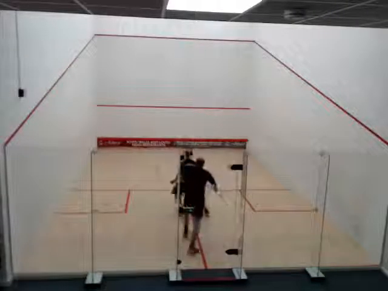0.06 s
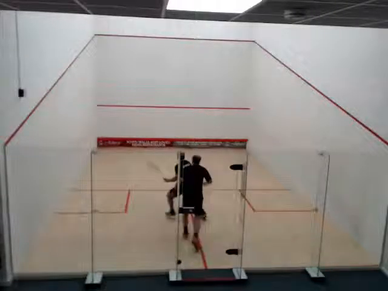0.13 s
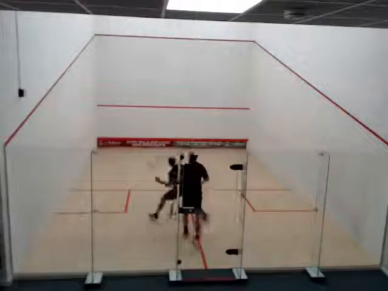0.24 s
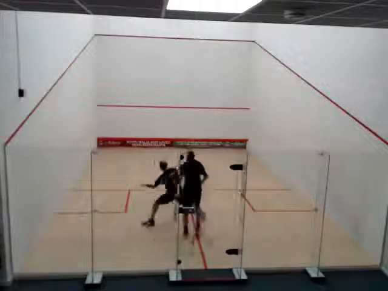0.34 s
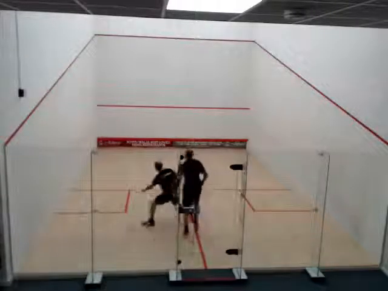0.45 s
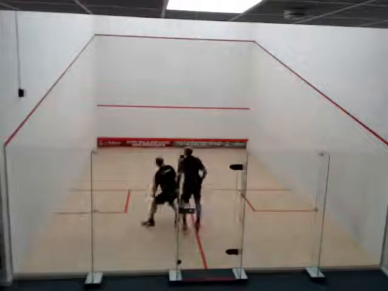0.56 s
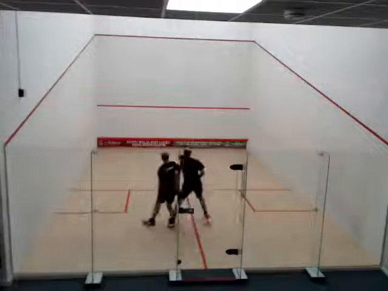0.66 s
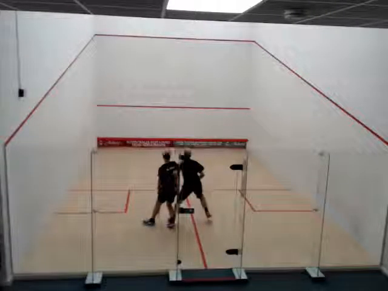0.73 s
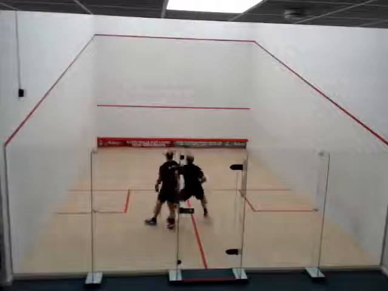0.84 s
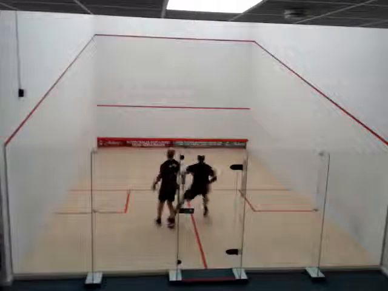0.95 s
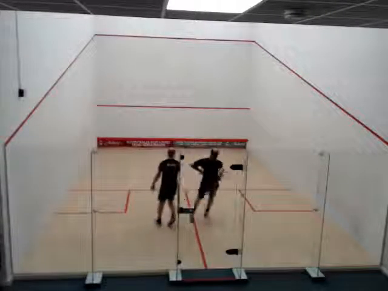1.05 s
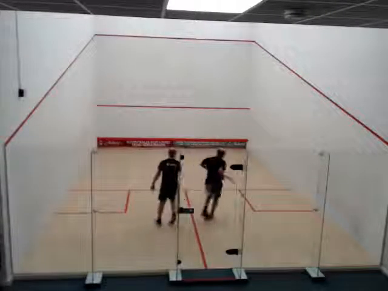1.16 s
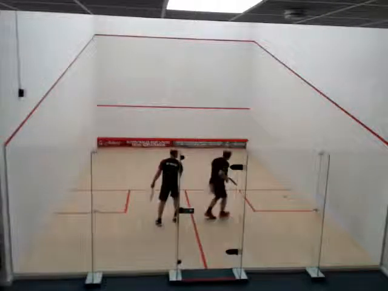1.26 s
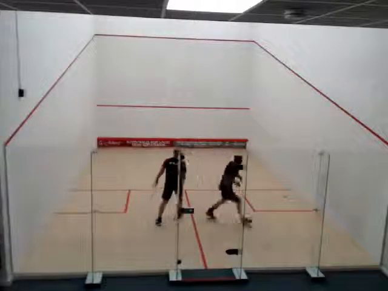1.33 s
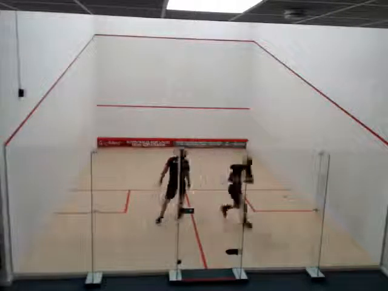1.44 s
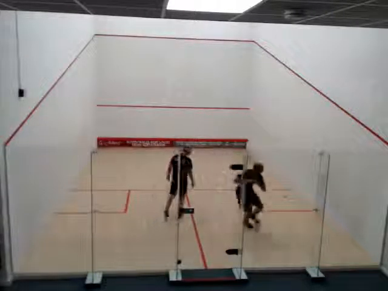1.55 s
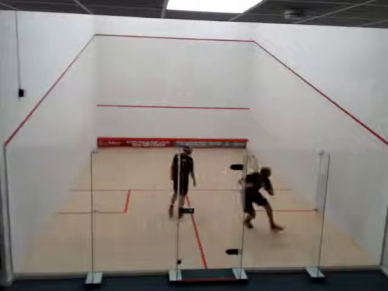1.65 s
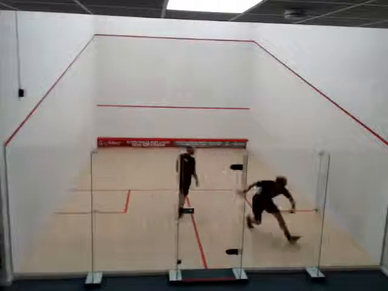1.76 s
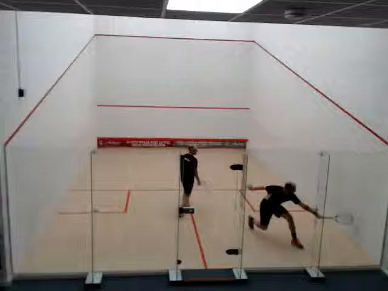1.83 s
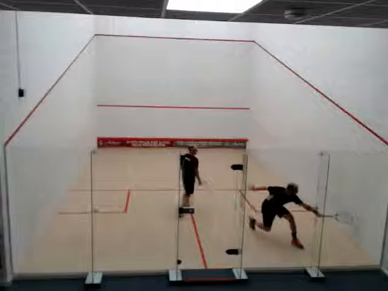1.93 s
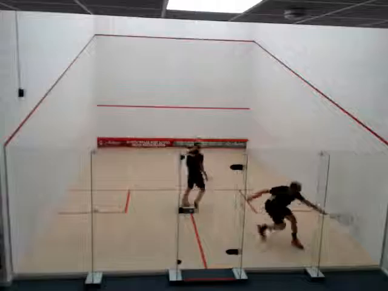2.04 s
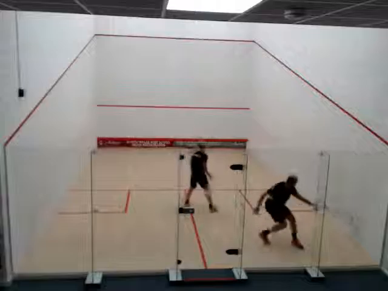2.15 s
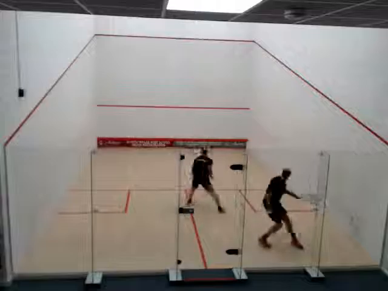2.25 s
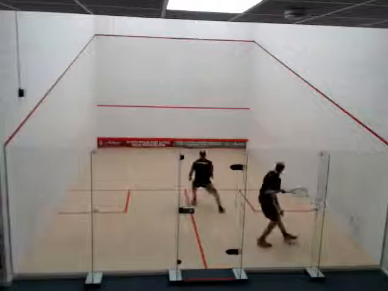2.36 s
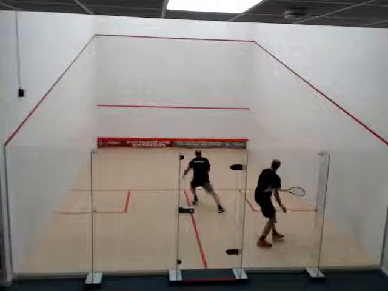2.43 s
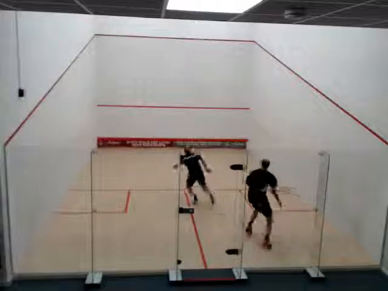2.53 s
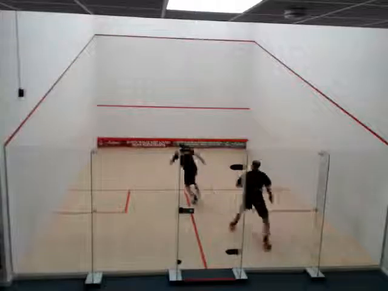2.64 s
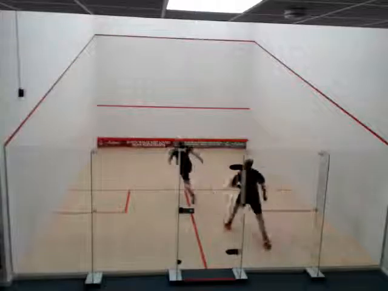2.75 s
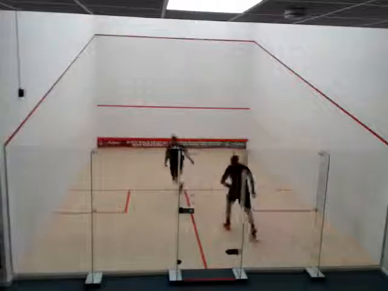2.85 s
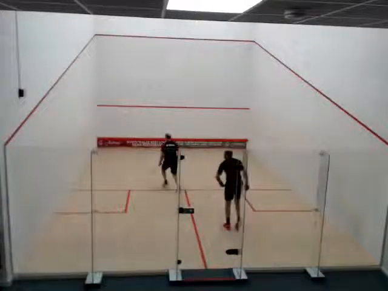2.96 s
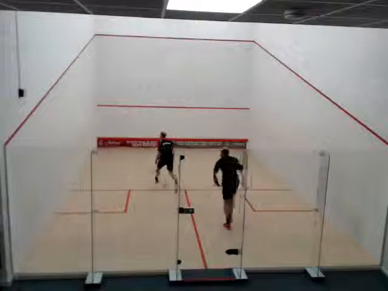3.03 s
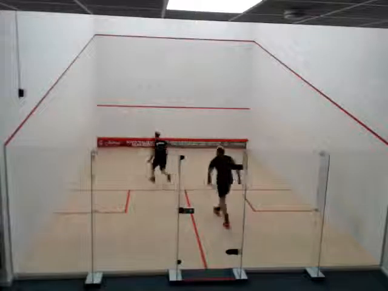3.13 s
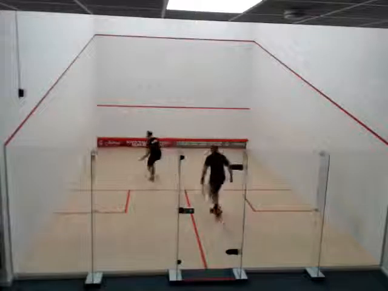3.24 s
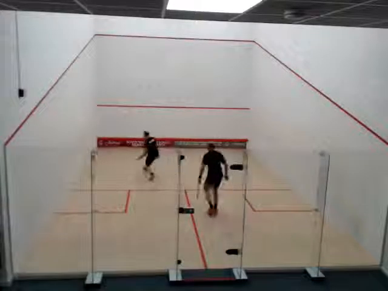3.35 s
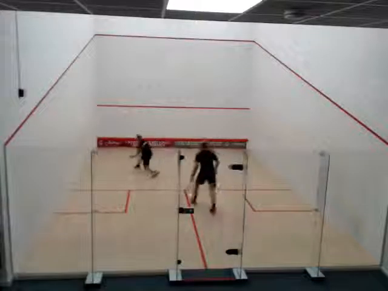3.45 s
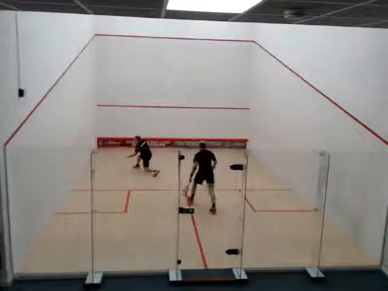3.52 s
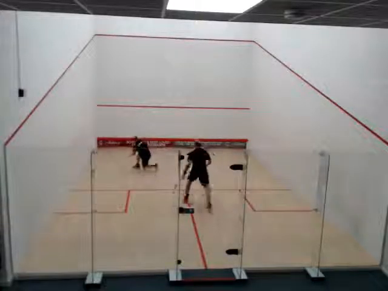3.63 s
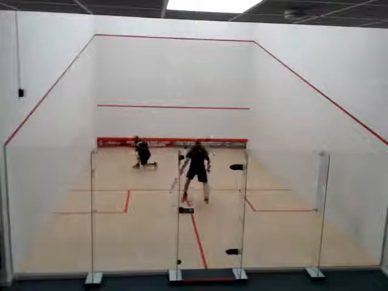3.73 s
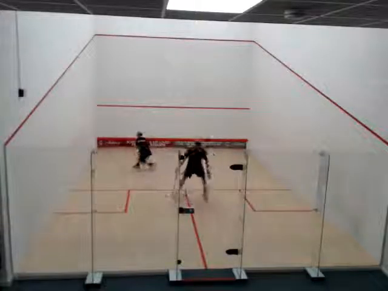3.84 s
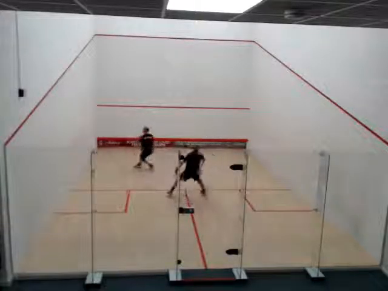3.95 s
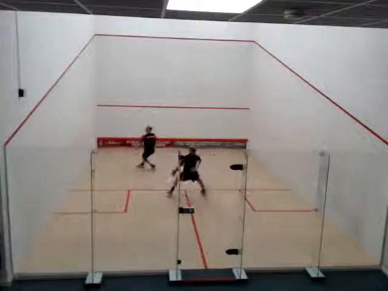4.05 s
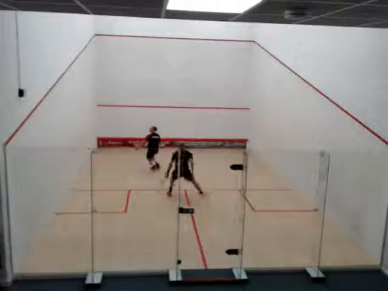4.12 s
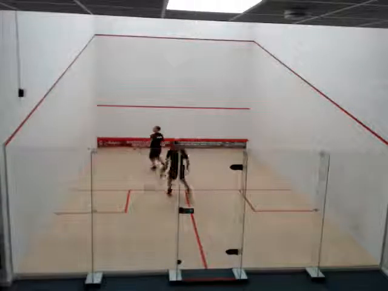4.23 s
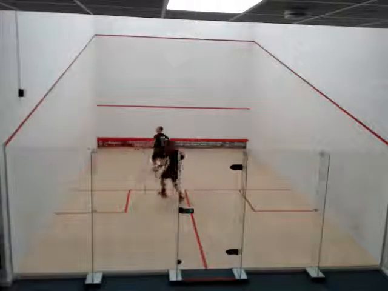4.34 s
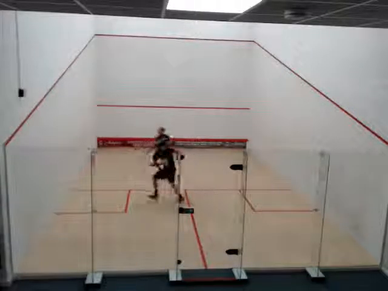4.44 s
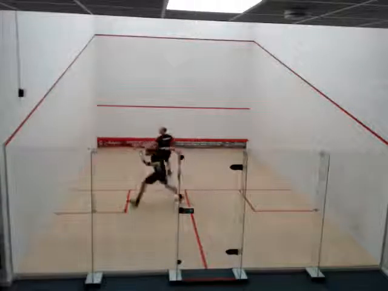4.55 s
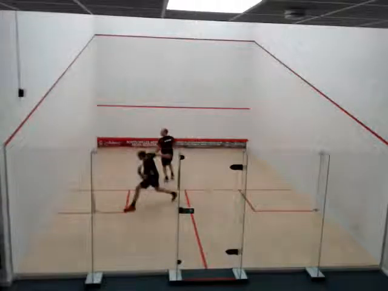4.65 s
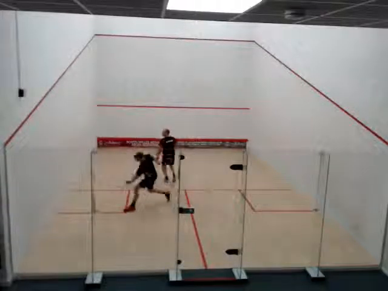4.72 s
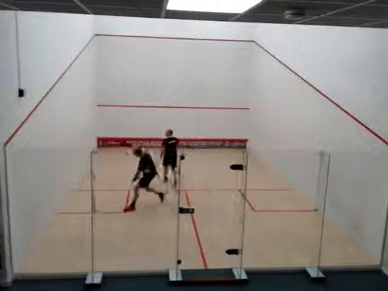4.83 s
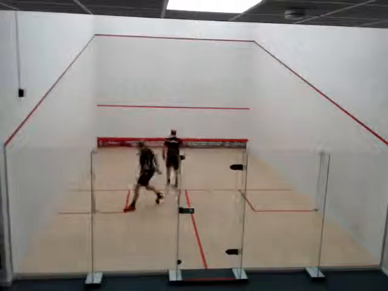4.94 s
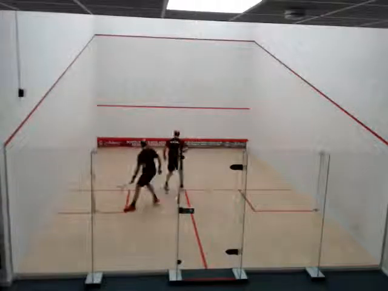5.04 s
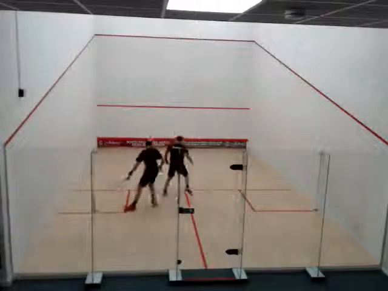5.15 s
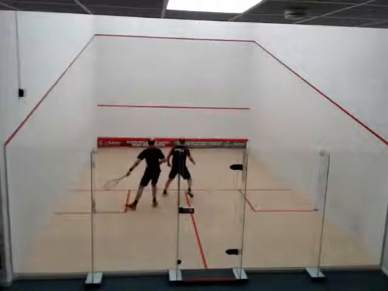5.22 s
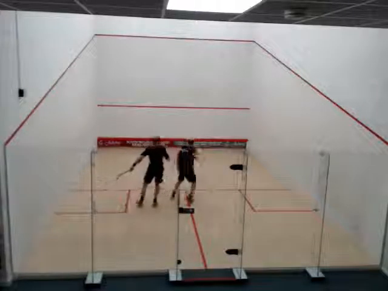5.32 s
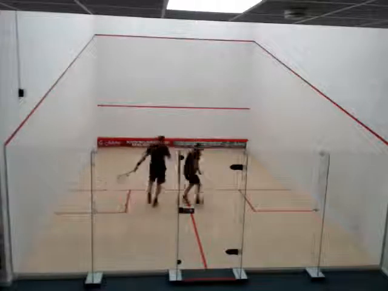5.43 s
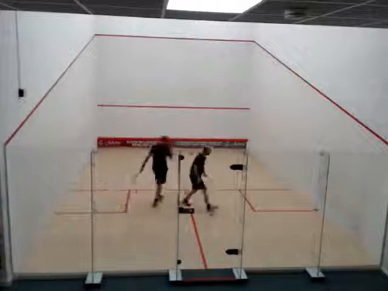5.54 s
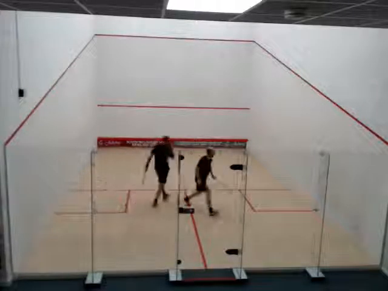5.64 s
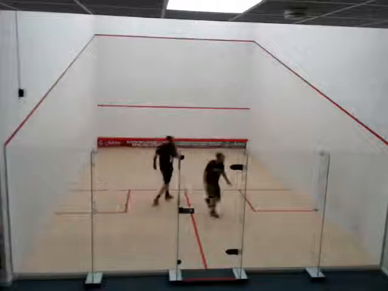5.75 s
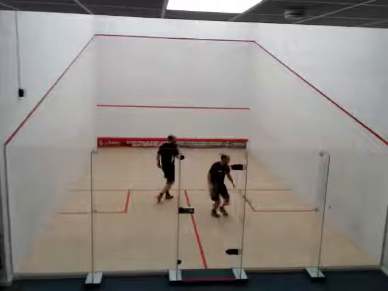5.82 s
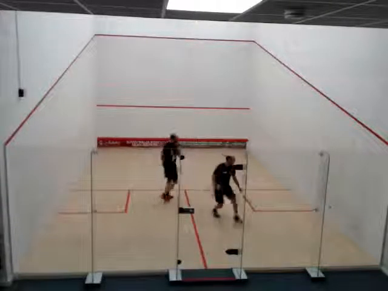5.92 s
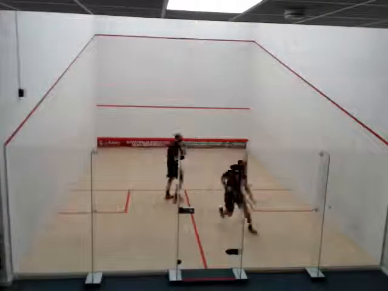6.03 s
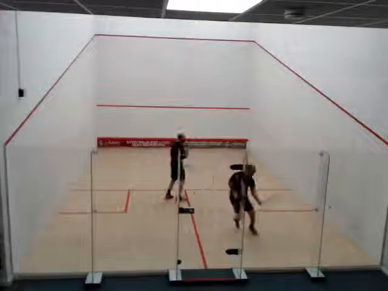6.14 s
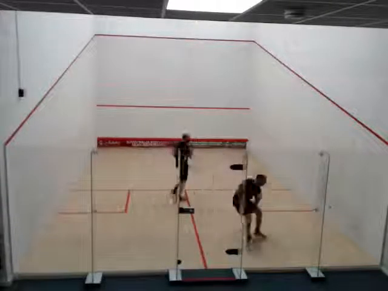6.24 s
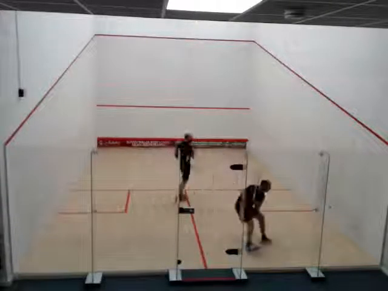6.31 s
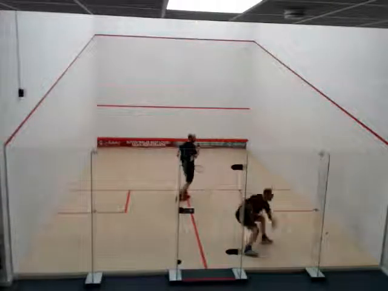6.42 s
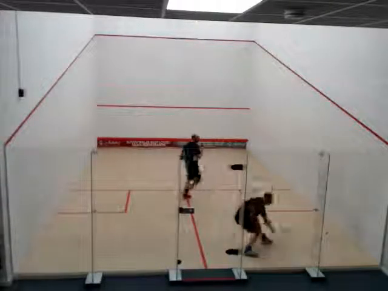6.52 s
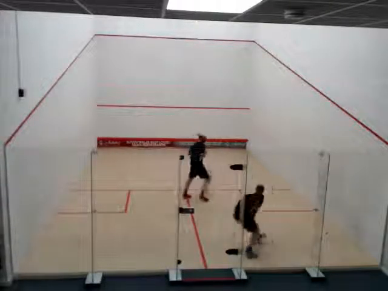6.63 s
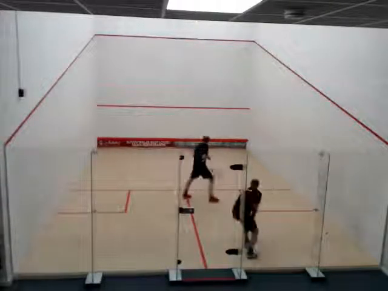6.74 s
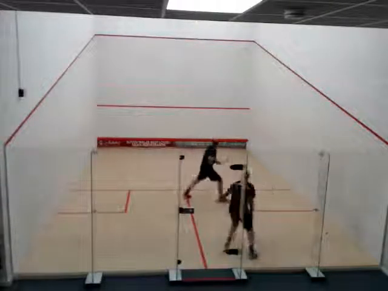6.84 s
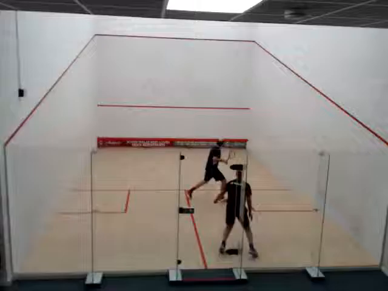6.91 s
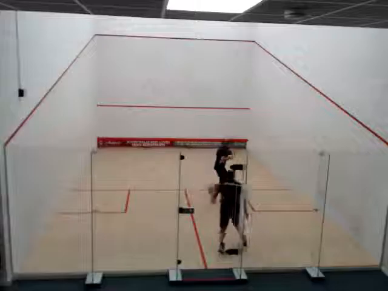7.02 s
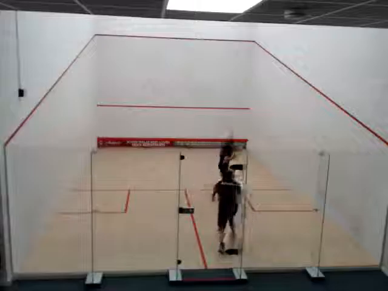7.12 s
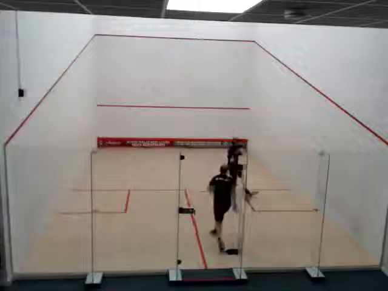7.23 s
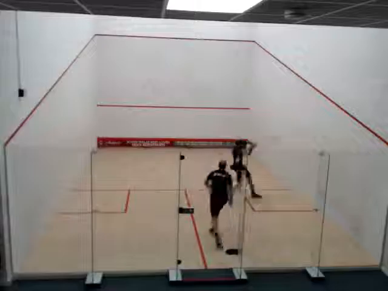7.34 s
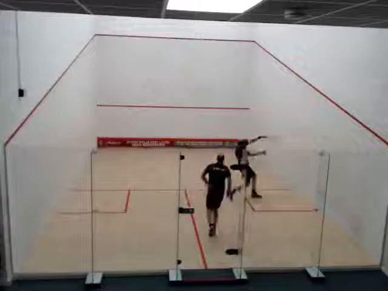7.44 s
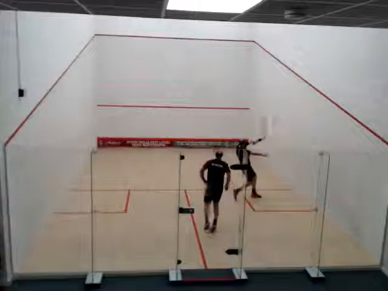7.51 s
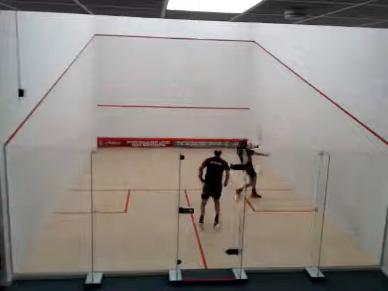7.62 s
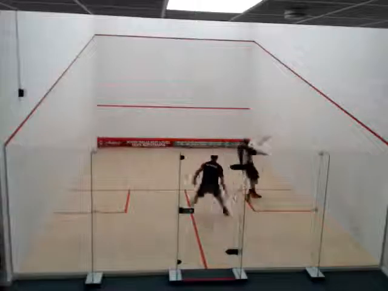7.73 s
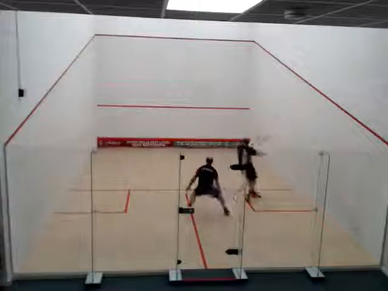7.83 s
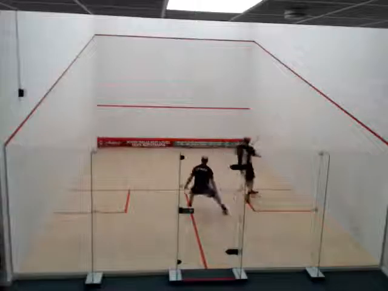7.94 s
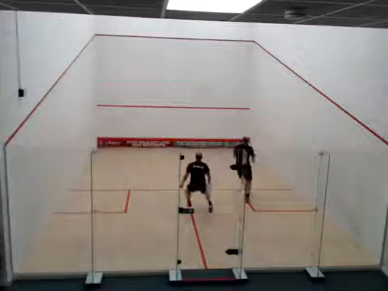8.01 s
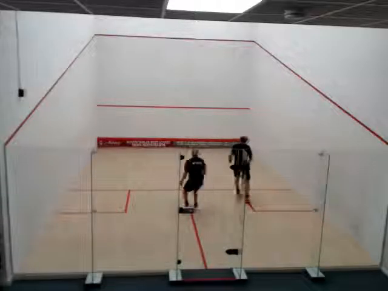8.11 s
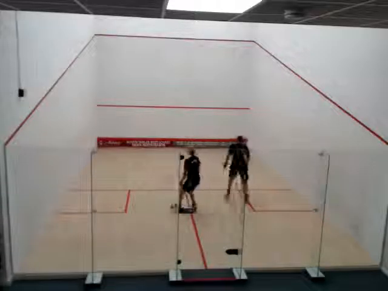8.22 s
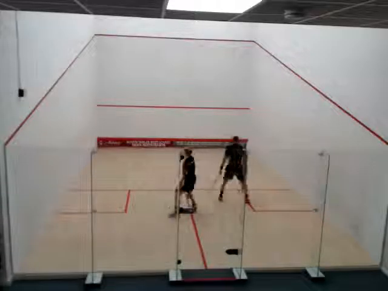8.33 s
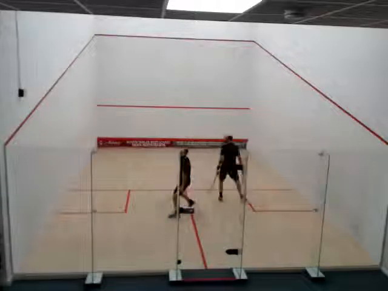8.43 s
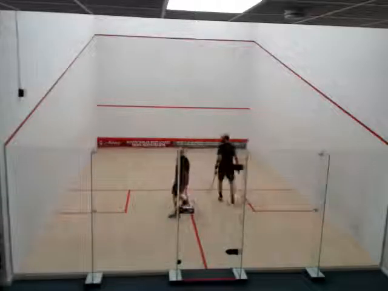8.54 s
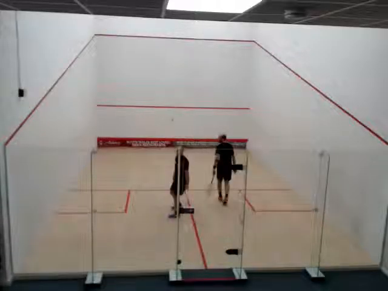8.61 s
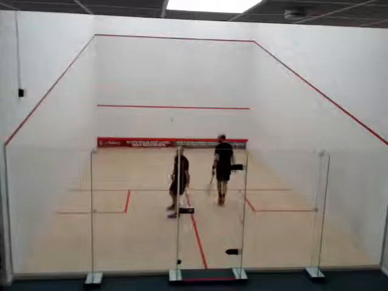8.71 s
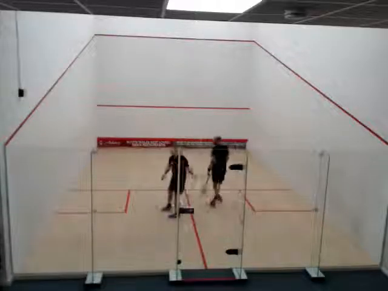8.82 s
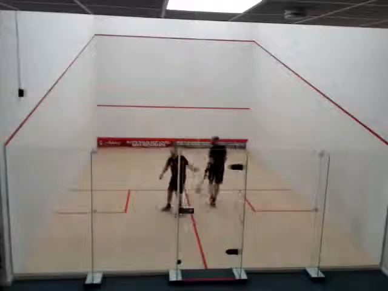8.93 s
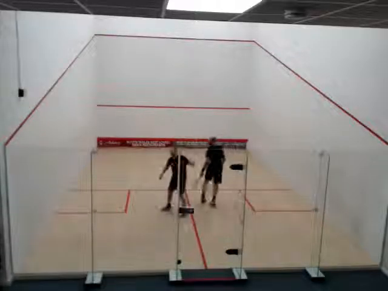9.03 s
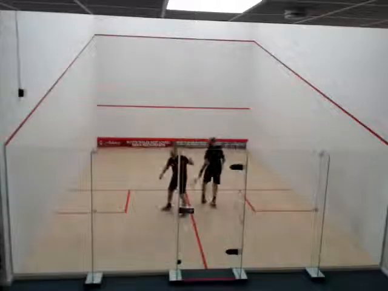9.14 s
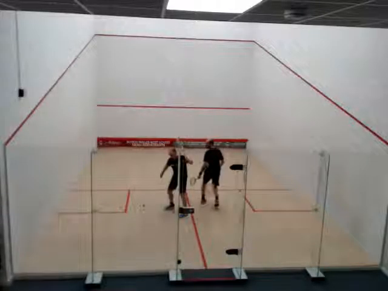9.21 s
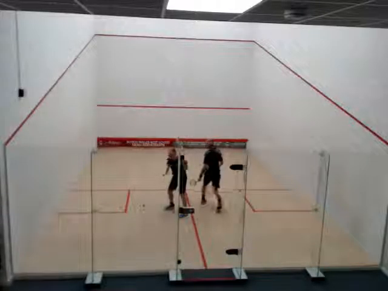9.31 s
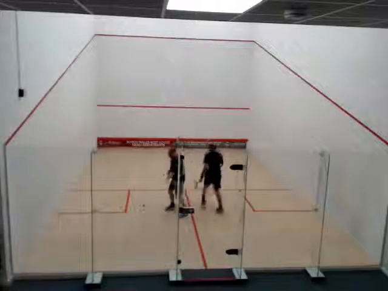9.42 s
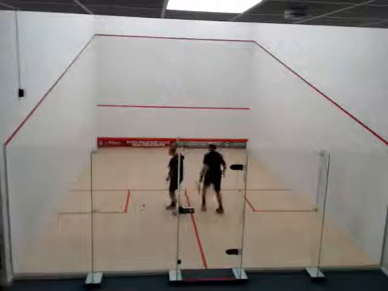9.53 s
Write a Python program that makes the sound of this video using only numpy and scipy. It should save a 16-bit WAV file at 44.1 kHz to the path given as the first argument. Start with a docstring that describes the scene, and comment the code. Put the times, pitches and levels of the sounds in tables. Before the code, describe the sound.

A loud racket crack and harder wall crack open a squash rally in a bright, echoing court. Running steps, toe taps and rubber chirps follow, then softer hits, another burst of thudding feet, and a strong racket-to-wall exchange near the middle. Later blows are lighter, with busy shuffling and a last racket hit at the end. Distant microphone behind glass, low ventilation hum, unevenly clipped reverberation.

```python
"""Racket and ball cracks of a squash rally, heard from behind the glass back wall of a hard-walled court.
Each blow is a sharp coloured pulse and a hollow knock; it flutters between the end walls and rings on.
Shoes thud, tap, scuff and squeak on the sprung wooden floor, built from decaying modes, noise and gliding tones;
steady ventilation noise lies underneath. A noise suppressor pulls each band down once it has faded,
so the tails end early and unevenly."""
import sys
import numpy as np
from scipy import signal
from scipy.fft import rfft, irfft
from scipy.io import wavfile
from scipy.ndimage import uniform_filter1d

SR = 44100
rng = np.random.default_rng(int(sys.argv[2]) if len(sys.argv) > 2 else 0)


def store_pcm(level_fs):
    """Save levels as 16-bit WAV."""
    pcm = np.round(np.clip(level_fs, -1, 1) * 32767).astype(np.int16)
    wavfile.write(sys.argv[1], SR, np.atleast_2d(pcm).T)


N = 422037
LEAD = SR // 2   # samples before the start: the rally is already under way
TAIL = 2 * SR    # samples of court tail
ROUND_TRIP_S = .0565   # between the end walls and back
FIRM_DB = 26.5   # level of a firm blow: the clack near 1.4 kHz changes across it


def from_db(db):
    """Decibels to gain."""
    return 10 ** (np.asarray(db) / 20)


def at_hz(points, hz):
    """Read a table on a log-frequency axis."""
    f, value = np.transpose(points)
    return np.interp(np.log(np.maximum(hz, 1)), np.log(f), value)


def add(out, s, sound):
    """Mix a sound in at time s."""
    i = LEAD + round(s * SR)
    out[i:i + len(sound)] += sound[:len(out) - i]


def treble(x, hz):
    """A gentle first-order high-pass."""
    sos = signal.butter(1, hz, "high", fs=SR, output="sos")
    return signal.sosfilt(sos, x + 1e-18)  # the tiny offset keeps silence numerically safe


def wobble(length, size):
    """Random unsteadiness of spread 1, smoothed over size samples."""
    noise = uniform_filter1d(rng.standard_normal(length), size=size)
    return noise / noise.std()


def contact(colour, body_db=0, bright_db=0, pitch=1, clack_db=0, clack_hz=1400, size=2048):
    """The short pulse of a contact: its colour, shifted and tilted, becomes a causal minimum-phase click."""
    hz = np.arange(size // 2 + 1) * SR / size
    db = at_hz(colour, hz / pitch)
    db = db + body_db / (1 + (hz / 480) ** 4)
    db = db + bright_db * (1 - 1 / (1 + (hz / 1600) ** 2))
    db = db + clack_db * np.exp(-((hz - clack_hz) / 330) ** 2)
    # folding the cepstrum onto positive times puts the energy right at the onset
    cepstrum = irfft(np.log(from_db(db)))
    cepstrum[1:size // 2] *= 2
    cepstrum[size // 2 + 1:] = 0
    return irfft(np.exp(rfft(cepstrum)))


def ringing(modes, detune, attack_s=.00005):
    """A struck body: sines that swell and decay, tuned a little differently for every blow."""
    t = np.arange(SR // 4) / SR
    total = 0
    for hz, db, t60 in modes:
        total = total + from_db(db - 60 * t / t60) * np.sin(2 * np.pi * hz * rng.normal(1, detune) * t)
    return (1 - np.exp(-t / attack_s)) * total


# how long the court rings in each band: pitch_hz, t60_s
COURT_T60 = [(80, 0.16), (200, 1.47), (400, 1.8), (800, 2.17), (2000, 1.83), (4000, 1.3), (8000, 0.78)]


def diffuse_tails(flutter_db=.7, flutter_lag_s=.012, count=12):
    """Makes a maker of court tails: noise dying band by band, swelling with each trip between the end walls."""
    centres = np.geomspace(80, 8000, count)
    white = rfft(rng.standard_normal(2 * TAIL))
    hz = np.arange(TAIL + 1) * SR / (2 * TAIL)
    bands = np.array([irfft(white * at_hz(np.c_[centres, share], hz)) for share in np.eye(count)])
    t = np.arange(TAIL) / SR
    fade = from_db(-60 * t / at_hz(COURT_T60, centres)[:, None])
    fade = fade * (1 - np.exp(-t / 0.0084)) / np.sqrt(SR / 10)  # soft build-up, then level
    fade = fade * from_db(flutter_db * np.cos(2 * np.pi * (t - flutter_lag_s) / ROUND_TRIP_S))
    bands, fade = bands.astype(np.float32), fade.astype(np.float32)

    def tail():
        """One tail, cut from a random place in the noise so that every spot differs."""
        i = rng.integers(TAIL)
        return np.einsum("bt,bt->t", bands[:, i:i + TAIL], fade)
    return tail


def court(tail, direct_db, flutter_db=-5.0, spread_s=.0135, near_db=-2, echo_db=2, echo_hz=1400,
          crack_db=-20, crack_hz=2600, smear_s=.002, smear_share=.5, count=7, size=512):
    """Court response: direct sound, close reflections and fading end-wall echoes, brighter than the tail."""
    first, echoes = np.zeros((2, TAIL))
    for trip in range(count):
        start = round(trip * ROUND_TRIP_S * SR)
        gain = from_db(direct_db + trip * flutter_db)
        # later trips spread over a longer time
        late = start + (spread_s * SR * (1 + trip / 2) * rng.uniform(.2, 1, count) ** 2).astype(int)
        arrivals = echoes if trip else first
        front = rng.standard_normal(size) * np.exp(-np.arange(size) / (smear_s * SR))  # scattered at the glass
        front *= smear_share / np.linalg.norm(front)
        front[0] += np.sqrt(max(1 - smear_share ** 2, 0))
        arrivals[start:start + size] += front * gain / np.sqrt(1 + trip / 2)
        arrivals[late] += gain * from_db(near_db) * rng.choice([-1, 1], count) / 2
    crack = from_db(crack_db) * treble(first, crack_hz)
    return tail() + first + crack + from_db(echo_db) * treble(echoes, echo_hz)


# colour of the hall's air noise: pitch_hz, level_db
VENTILATION = [(25, -8.5), (60, -11), (110, 8.5), (300, -2), (750, 0), (1400, -11), (2200, -13),
               (3200, -19.5), (5000, -28.5), (7000, -34.5), (9000, -52.5)]


def ventilation(level_db=-30.5):
    """Steady air noise of the hall: white noise through a fixed colour."""
    air = signal.fftconvolve(rng.standard_normal(LEAD + N), contact(VENTILATION))
    return from_db(level_db) * air[:LEAD + N]


# heels and toes landing on the boards: start_s, level_db, sole_slap_db
FOOTWORK = [(.381, -26, -2), (.4, -24, -2), (.437, -23, -2), (.493, -26, 0), (.581, -29, 0),
            (1.249, -33, -5), (1.399, -34, -2), (1.833, -28, 2), (1.852, -20, 0), (1.906, -22, 0),
            (1.937, -17.5, 0), (1.98, -19.5, 2), (2.03, -25, 0), (2.064, -24, 0), (2.094, -29, -3),
            (2.284, -37, 0), (3.006, -37, -6), (3.039, -35, -7), (3.082, -32, -11), (3.112, -29, -15),
            (3.161, -24, -18), (3.212, -26, -14), (3.249, -34, -13), (3.329, -35, -9), (3.407, -29, -13),
            (3.469, -38, -9), (3.535, -22, -6), (3.548, -23, 7), (3.587, -24, 7), (3.64, -12, -3),
            (3.692, -14, -5), (3.718, -14, -6), (3.814, -18, -3), (3.908, -23, -3), (3.946, -24, -3),
            (4.003, -22, -4), (4.042, -19, -5), (4.09, -21, -5), (4.15, -28, -3), (4.239, -32, 11),
            (4.415, -30, 10), (4.545, -39, -4), (4.668, -28, -14), (4.684, -17, -12), (4.712, -21, -3),
            (4.755, -20, -3), (4.808, -25, -4), (5.619, -37, 7), (6.078, -31, -12), (6.102, -26, -8),
            (6.162, -30, -11), (6.19, -32, -11), (6.222, -29, -9), (6.26, -31, -9), (6.41, -40, -5),
            (6.479, -34, -9), (6.611, -22, 1), (6.646, -20, 1), (6.679, -21, 1), (6.713, -22, 1),
            (6.778, -24, -2), (7.837, -18, -4), (7.868, -21, -2), (7.928, -18, -5), (7.964, -17, -8),
            (8.007, -16, -13), (8.042, -21, -3), (8.092, -22, -8), (8.137, -21, -9), (8.175, -28, -9),
            (8.22, -25, -11), (8.278, -32, -6), (8.304, -28, -6), (8.416, -27, -8), (8.544, -37, -2),
            (8.755, -34, -5), (8.78, -32, -3), (8.827, -31, -10), (8.891, -34, -6), (8.922, -30, -8),
            (8.95, -32, -5), (9.068, -35, -4)]
# low resonances of the sprung floor: pitch_hz, level_db, t60_s
FLOOR_MODES = [(85, -10, .22), (110.6, 4, .115), (132, .5, .15), (163, -2, .14), (201, -5, .14)]
# colour of a sole slapping the boards: pitch_hz, level_db
SLAP = [(60, -23), (250, -1.5), (450, 2.5), (800, -5.5), (1500, -10.5), (4000, -37), (9000, -56.5)]


def footfalls(tail, thud_db=4.5, room_db=-1.5, slap_db=36.5, lowest_hz=100, roll_s=0.0065, press_s=.009):
    """A heel or toe presses the sprung floor into its low modes, then the sole rolls down and slaps on the boards."""
    out, t, sole = np.zeros(LEAD + N), np.arange(SR // 4) / SR, contact(SLAP)
    boards = signal.butter(3, lowest_hz, "high", fs=SR, output="sos")  # boards radiate little deep bass
    rolling = np.maximum(t - press_s, 0)
    for s, level_db, sole_db in FOOTWORK:
        thud = signal.sosfilt(boards, ringing(FLOOR_MODES, detune=0.057, attack_s=press_s))
        roll = rng.standard_normal(len(t)) * rolling * np.exp(-rolling / roll_s)
        roll = roll / np.linalg.norm(roll)
        slap = from_db(sole_db + slap_db) * signal.fftconvolve(roll, sole)[:len(t)]
        near = from_db(thud_db) * thud + slap / 2
        room = signal.fftconvolve(from_db(room_db) * thud + slap, tail()[:SR])
        add(out, s - press_s, from_db(level_db) * near)
        add(out, s - press_s, from_db(level_db) * room)
    return out


# light steps on the toes: start_s, level_db, pitch_hz
TOE_TAPS = [(1.85, -24, 720), (2.178, -23, 310), (2.28, -29, 300), (6.11, -18, 600), (7.205, -18, 493),
            (7.255, -24, 394), (7.393, -23, 401), (7.454, -27, 390), (7.547, -20, 495), (7.597, -27.5, 357),
            (7.64, -25, 416), (7.68, -25, 441), (7.895, -18, 686), (8.045, -26, 430), (8.115, -26, 413)]


def toe_taps(tail, t60_s=0.06, attack_s=0.0066, direct_db=-1, upper_ratio=1.6, upper_db=-9):
    """Light, quick steps: the boards answer with a short hollow two-mode knock and no deep thud."""
    out = np.zeros(LEAD + N)
    for s, level_db, hz in TOE_TAPS:
        modes = [(hz, level_db, t60_s), (hz * upper_ratio, level_db + upper_db, t60_s)]
        knock = ringing(modes, detune=0.01, attack_s=attack_s)
        add(out, s, signal.fftconvolve(knock, court(tail, direct_db, near_db=1)))
    return out


# shoe scuffs and taps: start_s, level_db, decay_s
SCUFFS = [(2.68, 1, .0063), (2.736, -17, .011), (3.075, -17, .015), (3.186, -18, .012), (3.548, 10, .03),
          (3.567, 12, .04), (3.645, 6, .024), (4.722, 4, .05), (4.754, 3.5, .022), (4.835, 7, .063),
          (6.414, 3.5, .058), (7.544, 3.5, .02), (7.576, 1, .07), (8.886, 5, .015), (8.935, -12, .01),
          (9.071, 1, .0044)]
# colour of a sole dragged over wood: pitch_hz, level_db
SCUFF_COLOUR = [(100, -7.5), (500, 5), (1300, -7.5), (2000, -7.5), (3500, -9), (6000, -15), (9000, -36)]


def scuffs(tail, direct_db=-3):
    """A sole dragged briefly over the boards: a decaying burst of tiny slips."""
    out, pulse = np.zeros(LEAD + N), contact(SCUFF_COLOUR)
    for s, level_db, decay_s in SCUFFS:
        # cubing the noise leaves sparse, spiky slips
        slips = rng.standard_normal(SR // 8) ** 3 * np.exp(-np.arange(SR // 8) / (decay_s * SR))
        burst = signal.fftconvolve(slips / np.linalg.norm(slips), pulse)
        add(out, s, from_db(level_db) * signal.fftconvolve(burst, court(tail, direct_db)))
    return out


# sole squeaks, falling as a foot brakes, rising as it pushes off:
# start_s, length_s, pitch_hz, glide_hz, level_db, octave_db, unsteadiness (share of the pitch)
SQUEAKS = [(-.08, 0.049, 3126, -150, -23.5, -15.5, 0.03), (.8, .08, 4700, -300, -35.5, -23, 0.032),
           (1.254, 0.078, 3880, 5, -52, -6, 0.029), (1.307, .045, 3900, -300, -35.5, -17.5, .055),
           (1.4, .025, 2420, 60, -40, -20, .03), (1.424, .012, 2453, -120, -15.5, -5.5, .022),
           (1.901, 0.03, 2136, -130, -26.5, -10, 0.028), (1.905, 0.045, 4200, -350, -36.5, -30, .035),
           (2.314, 0.019, 6960, -600, -48.5, -28, 0.017), (2.315, 0.018, 5196, -250, -41.5, -30, .012),
           (2.318, .13, 4130, -150, -42, -33, .036), (3.55, 0.038, 3610, -100, -35, -14.5, 0.018),
           (3.563, .025, 2340, -130, -27.5, -10, .05), (3.562, 0.031, 2990, -150, -38, -10, 0.044),
           (3.595, 0.072, 2313, -59, -34, -12, 0.037), (4.712, .016, 980, 150, -29, -22, .06),
           (4.713, .02, 3080, 450, -36.5, -21.5, .085), (4.722, .045, 630, -120, -29.5, -16, .08),
           (4.764, .028, 1380, -80, -35, -22, .06), (4.783, .026, 930, -200, -29, -22, .04),
           (4.825, .035, 520, 300, -29, -12, .1), (4.843, .03, 1050, 400, -26, -30, .1),
           (6.358, 0.026, 3720, 107, -40.5, -14, .008), (6.406, 0.028, 3653, 148, -27, -15, 0.016),
           (6.431, .1, 3914, 304, -31, -23, 0.064), (7.275, .14, 4920, -60, -38.5, -23.5, .024),
           (7.375, .04, 4900, -60, -39, -25, .02), (7.445, .085, 4930, -80, -43.5, -28, .016),
           (7.861, 0.1, 3850, 253, -44.5, -20, .035), (8.082, 0.035, 3073, 72, -32.5, -11.5, 0.029),
           (8.248, .04, 3096, -53, -42, -33, .025), (8.844, .035, 4170, 78, -52, -28, 0.016),
           (8.886, 0.0215, 1930, -300, -35, -18, 0.083), (9.037, 0.094, 3380, 194, -41, -22, .06),
           (9.057, 0.042, 2920, -120, -32, -20, 0.027), (9.072, 0.013, 3310, 597, -28.5, -12.5, 0.058),
           (9.12, .14, 2980, -100, -43, -15, .045)]


def squeaks(tail, direct_db=-2.0, rasp_db=-29, third_db=-29, grain_per_jitter=8.0, size=8192):
    """Rubber sticks and slips at a gliding, unsteady rate, with overtones; less steady grip is grainier."""
    out, t = np.zeros(LEAD + N), np.arange(size) / SR
    for s, length, pitch_hz, glide_hz, level_db, octave_db, jitter in SQUEAKS:
        progress = np.minimum(t / length, 1)
        hz = (pitch_hz + glide_hz * (progress - .5)) * (1 + jitter * wobble(size, size=60))
        phase = 2 * np.pi * np.cumsum(hz) / SR
        tone = np.sin(phase) + from_db(octave_db) * np.sin(2 * phase) + from_db(third_db) * np.sin(3 * phase)
        grain = grain_per_jitter * jitter
        grip = (1 + grain * uniform_filter1d(wobble(size, size=70), size=30)) / np.hypot(1, grain)
        rasp = from_db(rasp_db) * rng.standard_normal(size)
        swell = np.sqrt(progress * (1 - progress)) * 2  # rounded rise and fall
        slide = (grip * tone + rasp) * swell
        room = court(tail, direct_db, near_db=-6, echo_db=-2.5)
        add(out, s, from_db(level_db) * signal.fftconvolve(slide, room))
    return out


# racket swung through the air: loudest_s, level_db, rise_s, brightness_db
SWINGS = [(.44, 22, 0.099, -14), (.515, 23, 0.016, 1), (4.865, 16, 0.04, -4.5), (9.565, 15, 0.02, -3)]
# colour of the racket, in swings and in hits: pitch_hz, level_db
RACKET_COLOUR = [(60, -35.5), (150, -3), (300, -7), (450, 4.5), (800, 4), (1100, -2.5), (1500, -8),
                 (2200, -4.5), (2800, -14), (4500, -18), (7000, -22), (9000, -41)]


def swings(tail, direct_db=-10):
    """Air rushes through the strings: coloured noise swells and dies evenly around its loudest moment, near a stroke."""
    out, t = np.zeros(LEAD + N), np.arange(-SR // 8, SR // 8) / SR
    for s, level_db, rise, bright_db in SWINGS:
        rush = rng.standard_normal(len(t)) * np.exp(-(t / rise) ** 2)
        rush = signal.fftconvolve(rush / np.linalg.norm(rush), contact(RACKET_COLOUR, bright_db=bright_db))
        add(out, s + t[0], from_db(level_db) * signal.fftconvolve(rush, court(tail, direct_db)))
    return out


# strings and frame of the racket: pitch_hz, level_db, t60_s
STRING_MODES = [(1296, -40.5, .12), (2290, -44.5, .12), (3460, -52.5, .1), (4440, -56.5, .1)]


def ball_hits(hits, colour, tail, crack_db, soft_clack_db, hard_clack_db, strings=0, squash_db=1.0,
              knock_t60_s=0.048, knock_attack_s=0.0043, knock_direct_db=3.5):
    """A sharp pulse and a hollow knock set the court ringing; a hard blow squashes the ball, altering its clack level."""
    out = np.zeros(LEAD + N)
    for s, level_db, body_db, bright_db, pitch, direct_db, knock_db, knock_hz, echo_db in hits:
        squashed = (1 + np.tanh((level_db - FIRM_DB) / squash_db)) / 2  # 0 soft, 1 hard
        clack_db = soft_clack_db + (hard_clack_db - soft_clack_db) * squashed
        pulse = contact(colour, body_db, bright_db, pitch, clack_db)
        # the strings' brief ping follows the brightness of the blow
        blow = strings * from_db(bright_db) * ringing(STRING_MODES, detune=0.015)
        blow[:len(pulse)] += pulse
        room = court(tail, direct_db, echo_db=echo_db, crack_db=crack_db)
        add(out, s, from_db(level_db) * signal.fftconvolve(blow, room))
        # the hollow ring of the ball and of what it strikes
        knock = ringing([(knock_hz, knock_db, knock_t60_s)], detune=0.012, attack_s=knock_attack_s)
        knock_room = court(tail, knock_direct_db, near_db=-1.5, spread_s=0.035)
        add(out, s, signal.fftconvolve(knock, knock_room))
    return out


# low resonances of the wall: pitch_hz, level_db, t60_s
WALL_THUMP = [(135, -12, .06), (210, -14, .05)]
# ball on wall or floor, for the thumps and the hits:
# start_s, level_db, body_db, brightness_db, pitch_factor, direct_db, knock_db, knock_hz, end_wall_echo_db
WALL_HITS = [(-.2, 37.5, -6, -5, .89, -20, -30.5, 763, 3), (.661, 33, -.5, -3, .97, -7.5, -15.5, 700, 4),
             (1.906, 19, -3, -9.5, .97, -15, -18.5, 1000, 2), (1.958, 12, -4, 6.5, .94, -17, -20, 520, 2),
             (3.741, 31.5, -.5, .5, .89, -10, -14, 787, 5.5),
             (3.999, 29.7, -5, -9, .86, -11.5, -11, 761, 3), (4.988, 35.6, -3, 0, 1.022, -10, -11, 344, 7),
             (6.638, 26, -1, 2, .9, -14, -13.5, 767, 4), (6.884, 21, 6, 4.5, .92, -7, -11.5, 725, 5),
             (8.254, 15, -9, -1.5, .91, -25, -27, 780, 3)]


def wall_thumps(tail, direct_db=13):
    """A hard drive also shakes the wall, which gives a short low thump."""
    out = np.zeros(LEAD + N)
    for s, level_db, *_ in WALL_HITS:
        if level_db > FIRM_DB:
            thump = ringing(WALL_THUMP, detune=0.02, attack_s=0.002)
            room = court(tail, direct_db, flutter_db=-14, near_db=-12)
            add(out, s, from_db(level_db - FIRM_DB - 24.5) * signal.fftconvolve(thump, room))
    return out


# colour of the ball on a hard surface: pitch_hz, level_db
BALL_COLOUR = [(60, -32.5), (150, -4.5), (300, -6), (430, 1), (650, 2.5), (850, 6), (1100, -2.5),
               (1500, -17), (2200, -3.5), (3000, -13.5), (4500, -18), (7000, -23), (9000, -38.5)]


def wall_hits(tail):
    """The ball cracks on wall or floor: soft blows clack strongly, hard ones lose the clack."""
    return ball_hits(WALL_HITS, BALL_COLOUR, tail, crack_db=1.0, soft_clack_db=13.0, hard_clack_db=-0.6)


# racket on ball:
# start_s, level_db, body_db, brightness_db, pitch_factor, direct_db, knock_db, knock_hz, end_wall_echo_db
RACKET_HITS = [(.516, 31, -8.5, -4.5, .86, -11.5, -15, 1086, 0),
               (1.882, 13.5, 9, -22.5, 1.2, -14, -12.5, 715, -4), (3.678, 19, 2, -4, 1, -15, -21, 900, -4),
               (4.871, 26, 2.5, -3, .95, -14, -18.5, 680, 6.5),
               (6.593, 24, 10, -11, 1.2, -15, -15.5, 800, -3),
               (7.776, 21.5, 2, 1.5, .91, -11.5, -17.5, 690, -3),
               (9.54, 19, -3.5, -9, .99, -18.5, -23.5, 720, 0)]


def racket_hits(tail):
    """The racket strikes the ball: a crack with a brief ping of strings and frame, clacking a little more when hard."""
    return ball_hits(RACKET_HITS, RACKET_COLOUR, tail, crack_db=-3.5, soft_clack_db=1.5, hard_clack_db=2.5,
                     strings=0.16)


def scene():
    """Ball, shoes and air in one court."""
    tail = diffuse_tails()
    rackets = racket_hits(tail) + swings(tail)
    walls = wall_hits(tail) + wall_thumps(tail)
    shoes = footfalls(tail) + toe_taps(tail) + scuffs(tail) + squeaks(tail)
    return (rackets + walls + shoes + ventilation())[None, LEAD:]


# level under which the suppressor closes: pitch_hz, level_db (against white noise of rms 1)
THRESHOLD = [(60, -18), (130, -17.3), (200, -20), (320, -19.3), (750, -12.9), (1400, -25), (2200, -27),
             (3200, -35), (5000, -40.5), (8000, -57.5)]


def suppress(x, depth_db=11.8, knee_db=1.8, pool_share=0.18, size=768):
    """Noise suppressor: each band is turned down while under its threshold; bands widen with frequency."""
    overlap = size - size // 4
    hz, _, frames = signal.stft(x, SR, nperseg=size, noverlap=overlap)
    power = np.abs(frames[0]) ** 2 * size * 2 / 3  # white noise of rms 1 reads 0 dB
    reach = (np.arange(len(hz)) * pool_share + .5).astype(int)
    pooled = np.array([power[max(k - r, 0):k + r + 1].mean(axis=0) for k, r in enumerate(reach)])
    smooth = uniform_filter1d(pooled, size=5, axis=-1)  # over five frames
    level_db = 10 * np.log10(np.maximum(smooth, 1e-14))
    above_db = level_db - at_hz(THRESHOLD, hz)[:, None]
    gain = from_db(-depth_db * (1 - np.tanh(above_db / knee_db)) / 2)
    return signal.istft(frames * gain, SR, nperseg=size, noverlap=overlap)[1][:, :N]


def record(dry, ceiling=0.54, low_cut_hz=55, high_cut_hz=8300):
    """Noise suppression, rounded peaks and a narrow bandwidth."""
    low_cut = signal.butter(2, low_cut_hz, "high", fs=SR, output="sos")
    thin = signal.sosfilt(low_cut, suppress(dry))
    rounded = ceiling * np.tanh(thin / ceiling)
    high_cut = signal.ellip(8, .5, 70, high_cut_hz, fs=SR, output="sos")
    return signal.sosfilt(high_cut, rounded)


dry = scene()
out = record(dry)
store_pcm(out)
```